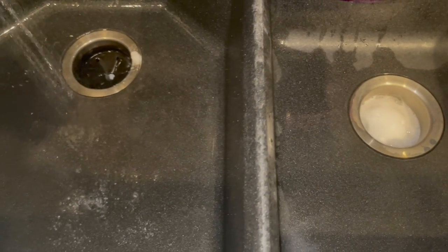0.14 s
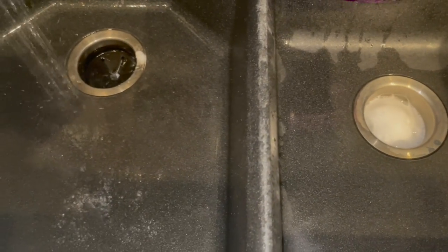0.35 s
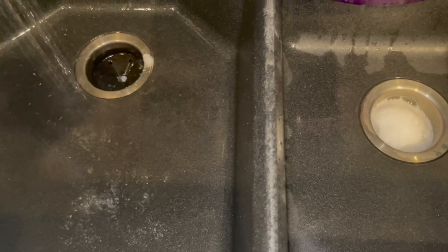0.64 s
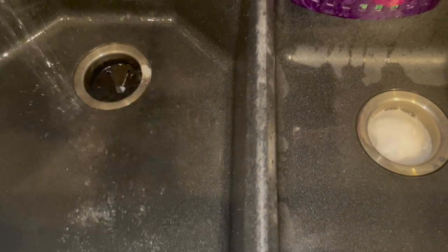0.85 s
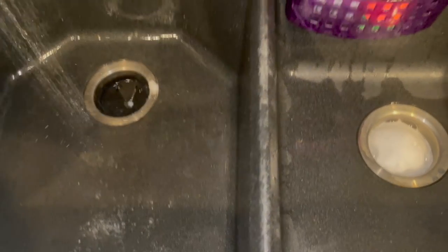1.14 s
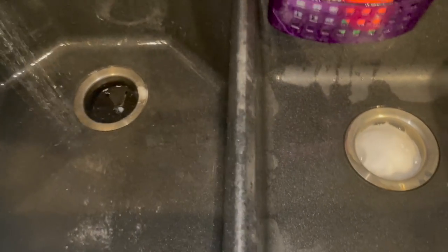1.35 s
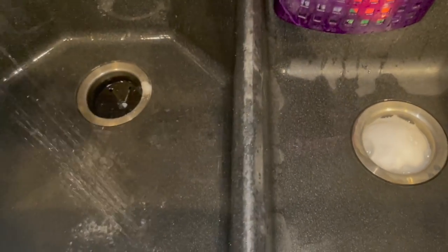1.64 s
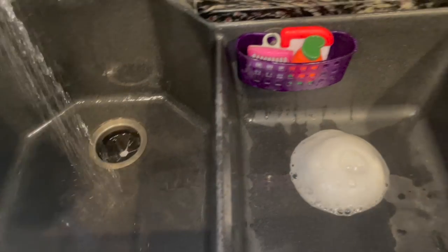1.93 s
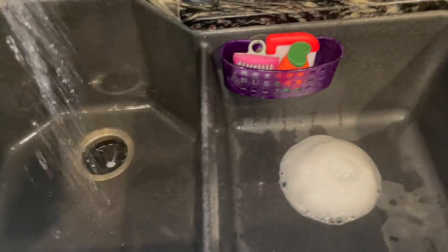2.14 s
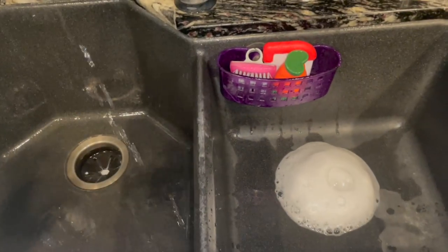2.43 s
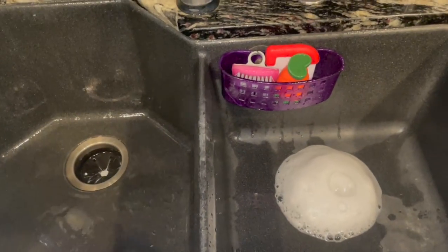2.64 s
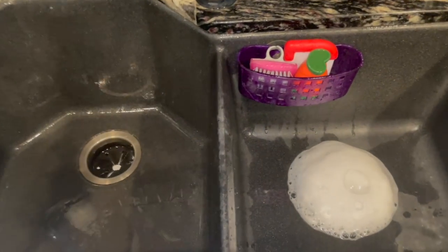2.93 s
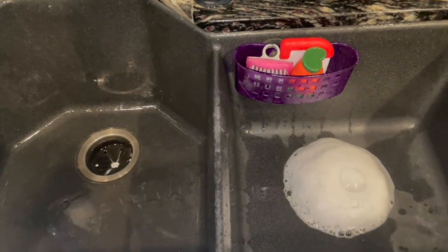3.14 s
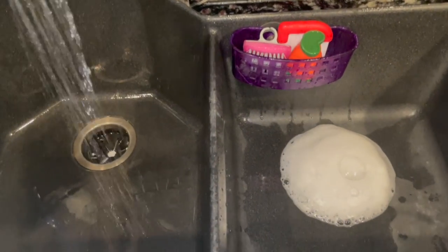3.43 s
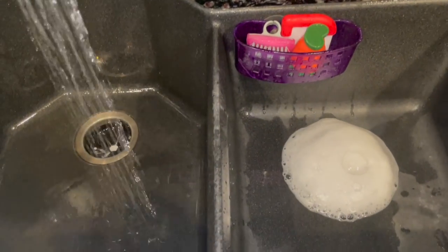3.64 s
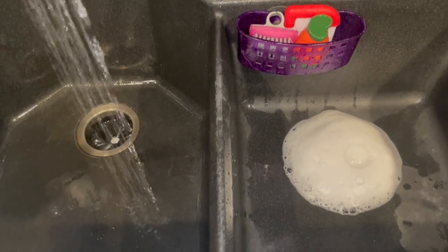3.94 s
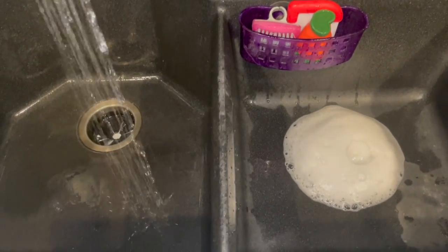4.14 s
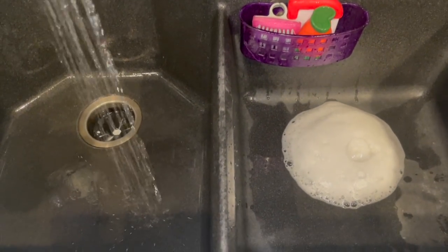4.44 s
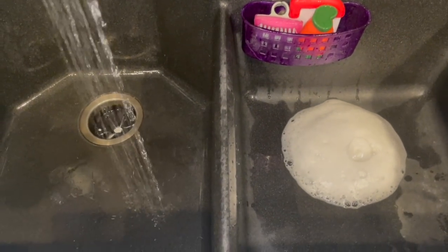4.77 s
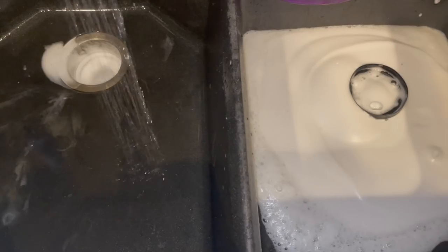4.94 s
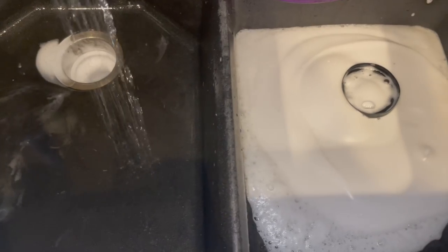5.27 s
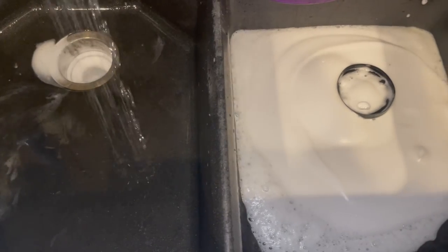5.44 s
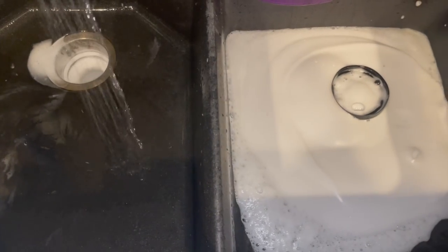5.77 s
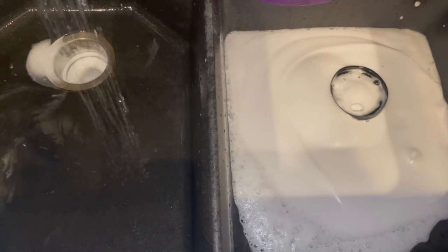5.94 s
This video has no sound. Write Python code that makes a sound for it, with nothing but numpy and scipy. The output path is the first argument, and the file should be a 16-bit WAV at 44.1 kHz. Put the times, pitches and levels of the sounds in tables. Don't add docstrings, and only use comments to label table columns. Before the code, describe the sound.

Close kitchen disposal motor whirring under running spray, abruptly turning to muffled bubbling gulps in a flooded drain, then abruptly to harsh, hissing grinding.

```python
import sys
import numpy as np
from scipy import signal
from scipy.fft import rfft, irfft
from scipy.io import wavfile
from scipy.ndimage import uniform_filter1d

SR = 44100
rng = np.random.default_rng(int(sys.argv[2]) if len(sys.argv) > 2 else 0)


def wrap_up_sound(samples):
    columns = np.atleast_2d(samples).T
    tamed = np.clip(columns, -1, 1)
    steps = np.round(tamed * 32767).astype(np.int16)
    wavfile.write(sys.argv[1], SR, steps)


def how_loud(loudness_db):
    steps = np.asarray(loudness_db, float) / 20
    return 10 ** steps


N = 269010
FLOODED = 1

CUTS = [0, 1.7215, 4.8885, 6.1]
# low edge in Hz, high edge in Hz, flicker in dB,
# flickers per second, once-a-turn beat [0-1], steadiness [0-1].
LAYERS = [(0, 580, 0, 30, 0.17, 0.52), (605, 2380, 1.5, 28, 0.01, 0.86), (2820, 4020, 1.5, 270, 0, 0.2),
          (4620, 7500, 0.8, 230, 0, 1), (7200, 13600, 0.5, 300, 0, 1)]


def evened(x):
    return x / np.sqrt(np.mean(x ** 2) + 1e-20)


def slow(count, per_s):
    size = max(int(SR / per_s / 2), 1)
    smooth = uniform_filter1d(rng.standard_normal(count), size)
    return evened(uniform_filter1d(smooth, size))


def shaped(x, gain):
    return irfft(rfft(x) * gain, x.shape[-1])


def motor(t, stretch):
    shaft_hz = [64.12, 63.93, 63.53]
    slosh_db = [-1.36, 3.5, 1.7]
    # multiple of the shaft, then dB at the start of each stretch.
    low_orders = [(1, -28.5, -29.5, -35), (2, -27, -23.5, -26), (3, -17.5, -32, -33), (4, -24.5, -41, -45)]
    # dB per second in each stretch, share of the slosh felt [0-1].
    order_drift = [(-0.2, 0.06, -0.5, 0.38), (-4.5, -3, -0.9, 0.23), (-1.5, -3.5, -0.5, 1),
                   (1.4, 3.95, 11, 1)]
    # multiple of the shaft, then dB in each stretch.
    high_orders = [(5, -46, -50, -39.5), (6, -32.5, -42.5, -37), (8, -38, -46, -39), (10, -43, -50.5, -42),
                   (18, -37.5, -54, -39.5), (36, -46, -96, -46)]

    count = len(t)
    turns = np.cumsum(shaft_hz[stretch] + 0.094 * slow(count, 2.75)) / SR
    load = slow(count, 4.1)
    gulp_db, push, hum = 0, 0, 0
    if stretch == FLOODED:
        gulp_db = 0.18 * uniform_filter1d(opening(t), size=2000)
        push, hum = glugs(t)
    for (k, *start_db), (*drift_db, slosh) in zip(low_orders, order_drift):
        order_db = start_db[stretch] + drift_db[stretch] * (t - t[0])
        order_db = order_db + slosh * slosh_db[stretch] * load + gulp_db * (k > 1)
        strength = how_loud(order_db) + push * (k == 2)
        hum = hum + strength * np.cos(2 * np.pi * (k * turns + rng.random()))
    for k, *order_db in high_orders:
        strength = how_loud(order_db[stretch] + 3.06 * slow(count, 6.5))
        hum = hum + strength * np.cos(2 * np.pi * (k * (turns + 0.0041 * load) + rng.random()))
    return np.sqrt(2) * hum, turns


def housing():
    # frequency in Hz, dB per Hz.
    whirr_spectrum = [(500, 13), (620, 8), (1000, -0.5), (1900, -31), (2100, -30), (2600, -23), (6000, -44),
                      (11000, -29), (15000, -41), (16000, -72)]
    hz = np.fft.rfftfreq(N, 1 / SR)
    f, whirr_db = np.transpose(whirr_spectrum)
    gain = how_loud(np.interp(np.log(hz + 1), np.log(f), whirr_db, -99, -99))
    whirr = shaped(rng.standard_normal((2, N)), gain)
    return how_loud(-37 - 1.5) * evened(whirr)


def colour(hz, stretch):
    # frequency in Hz, then dB per Hz in each stretch.
    rumble = [(40, -74, -76, -97), (80, -69, -53, -74), (100, -60.5, -48, -55.5), (153, -49, -44.5, -45.5),
              (174.4, -41.5, -48.5, -42.5), (211.5, -40, -48, -34), (238.2, -41, -51, -38),
              (288, -58.5, -65, -53), (328, -52.5, -60.5, -46.5), (464, -57.5, -55.5, -45),
              (494, -55.5, -54, -39.5), (546, -61.5, -72.5, -54), (783, -62.5, -72, -57)]
    # frequency in Hz, then dB per Hz in each stretch.
    grind = [(987, -50, -62.5, -53), (1010, -61, -70, -55.5), (1440, -60.5, -71, -63.5),
             (1630, -68, -76.5, -65), (1832, -59.5, -76, -56.5), (2280, -65, -81, -70),
             (2530, -73.5, -86, -63.5), (3180, -62, -94.5, -69), (4080, -72, -92, -67.5),
             (3970, -75, -96, -71)]
    # frequency in Hz, then dB per Hz in each stretch.
    hiss = [(5020, -75, -87.5, -70), (5700, -70, -88, -76.5), (6180, -80.5, -94, -77),
            (7000, -71.5, -95.5, -74.5), (7400, -84.5, -94.5, -80.5), (9900, -67.5, -97, -66),
            (11000, -77, -99.5, -76.5), (13000, -74.5, -98, -80), (14600, -75, -101, -73.5),
            (15650, -88.5, -103, -89), (15900, -120, -120, -120)]
    # centre in Hz, width in Hz, boost in dB in each stretch.
    basin = [(244.5, 31.4, 4.6, 8.1, 8.2), (396, 3.3, 1.3, 1.1, 1.9), (461, 48, 11, 5.75, 3.4),
             (660, 26, 2.5, 11, 4.3), (759, 51, 3.4, 0.67, 5.8), (1189.6, 38, 14.6, 10.7, 16),
             (1329, 36, 5.6, 8.5, 2.9), (1675, 77, 12.8, 7.6, 15.6), (1773, 36, 12.1, 17, 18.3),
             (2207, 85, 3, 7, 15.4), (3250, 254, 3.1, 8.1, 6), (3530, 400, 1.1, 1.7, 7.3),
             (6064, 340, 6.9, 7.1, 9.8)]
    rows = np.array(rumble + grind + hiss)
    body_db = np.interp(np.log(hz + 1), np.log(rows[:, 0]), rows[:, 1 + stretch])
    for centre_hz, width_hz, *boost_db in basin:
        body_db += boost_db[stretch] / (1 + (2 * (hz - centre_hz) / width_hz) ** 2)
    return how_loud(body_db) * np.sqrt(SR / 2)


def surges(t, stretch):
    # time in seconds, level in dB.
    effort = [
        [(0, -0.5), (.3, 0.8), (1.2, 0.56), (1.72, -1.2)],
        [(1.72, 0.75), (4.89, -0.97)],
        [(4.89, -3), (5.1, 0.9), (5.5, 0.2), (6.1, -0.2)],
    ]
    swell_db = [0.94, 1.24, 1.65]
    # share of the opening, share of the tap,
    # offset in dB, drift in dB per second.
    follows = [(0.35, 0.017, -0.5, 0.95), (0.78, 0.022, -1.46, -0.1), (0.67, 0.12, 0, -2),
               (0.58, 1, -2, 4.5), (0.71, 0.54, -2.5, 1.5)]
    # time in seconds, level in dB.
    tap = [
        (1.72, 5.5),
        (2.5, 6.5),
        (3.35, 5),
        (3.5, 2),
        (4.22, -5),
        (4.3, -14),
        (4.89, -13),
    ]
    load_db = np.interp(t, *np.transpose(effort[stretch]))
    surge_db = np.array([load_db + swell_db[stretch] * slow(len(t), 8.8) for _ in LAYERS])
    if stretch == FLOODED:
        gulp_share, tap_share, offset_db, drift_db = (c[:, None] for c in np.transpose(follows))
        surge_db += gulp_share * opening(t)
        surge_db += tap_share * np.interp(t, *np.transpose(tap))
        surge_db += offset_db + drift_db * (t - t.mean())
    return surge_db


def spatter(count, stretch):
    # droplets per second, size spread in dB, share in dB.
    spatters = [(400, 46, -15), (226, -0.5, -1), (426, -13, -9.5)]
    per_s, spread_db, share_db = spatters[stretch]
    sizes = how_loud(spread_db * np.minimum(rng.exponential(1, count), 3.5))
    hits = (rng.random(count) < per_s / SR) * sizes
    return evened(signal.lfilter([1], [1, -np.exp(-1 / (0.0031 * SR))], hits)), share_db


def steadied(x, share):
    power = uniform_filter1d(x[0] ** 2, size=1800)
    return x * (np.mean(power) / (abs(power) + 1e-20)) ** (np.clip(share, 0, 1) / 2)


def water(t, turns, stretch):
    hz = np.fft.rfftfreq(len(t), 1 / SR)
    body, out = colour(hz, stretch), np.zeros((2, len(t)))
    gust = slow(len(t), 46.0)
    droplets, share_db = spatter(len(t), stretch)
    for (lo_hz, hi_hz, flicker_db, rate, beat, steady), level_db in zip(LAYERS, surges(t, stretch)):
        surge_db = uniform_filter1d(level_db, size=1500 if lo_hz < 100 else 300)
        flicker = how_loud(flicker_db * slow(len(t), rate) + 0.18 * gust)
        drive = evened(flicker * (1 + beat * np.cos(2 * np.pi * turns)))
        drive = evened(drive + how_loud(share_db) * droplets * (lo_hz > 2000))
        band = 1 / np.sqrt((1 + (lo_hz / (hz + 1)) ** 12) * (1 + (hz / hi_hz) ** 12))
        layer = shaped(drive * rng.standard_normal(out.shape), body * band)
        layer = steadied(layer, steady)
        out += shaped(layer * how_loud(surge_db), np.minimum(4 * band, 1))
    return out


def patchy(x, stretch):
    depth_db = [1, 2.0, 1]
    hz, _, z = signal.stft(x, SR, nperseg=512, noverlap=384)
    field = rng.standard_normal(z.shape[1:])
    for _ in range(2):
        field = uniform_filter1d(field, size=5, axis=0)
        field = uniform_filter1d(field, size=12, axis=1)
    above_rumble = np.clip(hz / 2500, 0, 1)[:, None]
    z = z * how_loud(depth_db[stretch] * evened(field) * above_rumble)
    return signal.istft(z, SR, nperseg=512, noverlap=384)[1][:, :x.shape[1]]


def echoed(x):
    # delay in ms, gain.
    walls = [(2.3, -.18), (3.7, .18), (5.9, -.16), (8.3, -.16), (12.1, .15), (17.3, .13)]
    hz = np.fft.rfftfreq(x.shape[1], 1 / SR)
    echoes = sum(gain * np.exp(-2j * np.pi * hz * delay_ms / 1000) for delay_ms, gain in walls)
    return shaped(x, 1 + echoes * np.clip(hz / 600 - .5, 0, 1))


def opening(t):
    # start in seconds, length in seconds, opening in dB.
    gulps = [(1.702, 0.21, 15), (1.992, 0.12, 14.5), (2.162, 0.13, 14), (2.396, 0.067, 17),
             (2.49, 0.089, 6.5), (2.62, 0.15, 8), (2.816, 0.23, 8.5), (3.093, 0.086, 11),
             (3.278, 0.11, 10.5), (3.498, 0.082, 4.5), (3.634, 0.15, 0), (3.839, 0.075, 9.5),
             (4.032, 0.048, 8), (4.187, 0.085, -4), (4.328, 0.088, -8), (4.444, 0.14, -8),
             (4.618, 0.036, 1.5), (4.756, 0.13, -10)]
    rise_s, close_db_per_s, shut_db, shut_sink_db_per_s = 0.07, 236, -5, 3
    start, length, top_db = (c[:, None] for c in np.transpose(gulps))
    rise = np.sin(np.pi / 2 * np.clip((t - start) / rise_s + 0.51, 0, 1)) ** 2
    gulp = rise * how_loud(top_db - close_db_per_s * np.maximum(t - start - length, 0))
    leak = how_loud(shut_db - shut_sink_db_per_s * (t - CUTS[1]))
    return 10 * np.log10((gulp ** 2).sum(0) + leak ** 2)


def choked():
    # centre in Hz, width in Hz, level in dB.
    fuzzy_tones = [(237, 17, -30), (352, 113, -35), (458, 35, -36), (2046, 10, -62.5)]
    hz, t = np.fft.rfftfreq(N, 1 / SR), np.arange(N) / SR
    tones = np.zeros(N)
    for centre_hz, width_hz, tone_db in fuzzy_tones:
        resonance = 1 / (1 + (2 * (hz - centre_hz) / width_hz) ** 2)
        tones += how_loud(tone_db) * evened(shaped(rng.standard_normal(N), resonance))
    growth = how_loud(2 * (t - CUTS[2]))
    return tones * growth * (t > CUTS[1]) * (t < CUTS[2])


def glugs(t):
    # peak in seconds, push in dB, own pitch in Hz, own level in dB.
    pockets = [(1.773, -21, 110, 0), (2.068, -10.5, 108, -12), (2.184, -10.5, 113, -11),
               (2.426, -5, 110, -11), (2.605, -14, 83.4, -16), (2.936, -10, 112, -5),
               (3.134, -12, 111, -15), (3.365, -16, 111, -11), (3.522, -12, 110.5, -9),
               (3.871, -14.5, 110, -12), (4.057, -15, 112, -15), (4.229, -26, 111, -17),
               (4.406, -24, 110, -18), (4.578, -18, 108, -20), (4.761, -21, 109, -16)]
    rise_s, fade_s, hum_db, note_db = 0.018, 0.033, -7.5, 3.5
    peak, push_db, hz, own_db = (c[:, None] for c in np.transpose(pockets))
    start = peak - rise_s
    rise = np.sin(np.pi / 2 * np.clip((t - start) / rise_s, 0, 1)) ** 2
    fade = np.exp(-np.maximum(t - start - rise_s, 0) / fade_s)
    shape = how_loud(push_db) * rise * fade
    note = how_loud(own_db + note_db) * shape * np.sin(2 * np.pi * hz * (t - start))
    return how_loud(hum_db) * shape.sum(0), note.sum(0)


def drops():
    # start in seconds, peak in dB, centre in Hz.
    ticks = [(1.8158, -37, 13100), (2.0931, -44, 11700), (2.164, -32, 13500), (2.3057, -34, 12400),
             (2.4438, -43, 13600), (2.9018, -35, 7300), (3.2904, -37, 7400), (3.3533, -37, 10900),
             (3.61, -26, 7800), (3.6681, -45, 13300), (3.6875, -42, 13100), (3.7174, -47, 13600),
             (3.75, -51, 13000), (3.7569, -44, 13400), (3.769, -47.5, 13000), (4.0103, -43, 12900),
             (4.1061, -50, 7300), (4.119, -36, 11800), (4.148, -39, 9630), (4.1739, -51, 13400),
             (4.2058, -44, 12100), (4.2587, -39, 9800), (4.3555, -57, 11700), (4.4782, -50, 13800),
             (4.5276, -53, 11100), (4.589, -53, 13100), (4.7376, -46, 13100), (4.7721, -31.5, 13700),
             (4.7874, -42.5, 10200), (4.9382, -37, 13400)]
    size = 2048
    out, t = np.zeros((2, N + size)), np.arange(size) / SR
    hz = np.fft.rfftfreq(size, 1 / SR)
    shape = np.minimum(t / 0.00083, 1) * ((t < .003) + np.exp(-t / 0.0054))
    for start, peak_db, centre_hz in ticks:
        tone = np.exp(-(np.log((hz + 1) / centre_hz) / 0.42) ** 2)
        burst = evened(shaped(rng.standard_normal((2, size)), tone))
        first = round(start * SR)
        out[:, first:first + size] += how_loud(peak_db - 4.5) * burst * shape
    return out[:, :N]


def scene():
    out = drops() + housing()
    for stretch in range(3):
        a, b = round(CUTS[stretch] * SR), round(CUTS[stretch + 1] * SR)
        t = np.arange(a, b) / SR
        hum, turns = motor(t, stretch)
        splashing = patchy(water(t, turns, stretch), stretch)
        out[:, a:b] += echoed(splashing)
        out[0, a:b] += hum
    out[0] += choked()
    return out


def roll_off(x):
    return signal.sosfilt(signal.butter(12, 15810, fs=SR, output="sos"), x)


def record(dry):
    # frequency in Hz, radians by which the left leads.
    port_lead = [(0, 0), (150, .3), (330, .85), (560, .8), (780, 1.3), (1120, 5.7), (1810, 9.4),
                 (2150, 12.3), (3270, 15.2), (3880, 19.3), (5170, 20.4), (6700, 18.85), (7800, 16.05),
                 (10200, 15.2), (13200, 12.57)]
    # frequency in Hz, left minus right in dB.
    port_balance = [(60, 1.5), (140, 2), (210, .5), (330, 3.5), (700, 7.5), (1290, 4.5), (2700, 3.5),
                    (4200, 5), (6400, 1.5), (7600, 0)]
    # frequency in Hz, likeness [0-1].
    port_same = [(60, .99), (200, .98), (300, .9), (450, .96), (800, .85), (1500, .82), (3000, .86),
                 (5300, .65), (6600, .68), (7900, .88), (9000, .96), (10200, .92), (11300, .75),
                 (13000, .95)]
    hz = np.fft.rfftfreq(N, 1 / SR)
    lead = np.interp(hz, *np.transpose(port_lead))
    tilt = how_loud(np.interp(hz, *np.transpose(port_balance)) / 2)
    same = np.clip(np.interp(hz, *np.transpose(port_same)), 0, 1)
    left = shaped(dry[0], tilt)
    right = shaped(dry[0], same * np.exp(-1j * lead) / tilt)
    right += shaped(dry[1], np.sqrt(1 - same ** 2) / tilt)
    limited = 0.94 * np.tanh(np.array([left, right]) / 1.348) * 1.269
    mix = shaped(limited, hz < 15850)
    return roll_off(mix)


dry = scene()
out = record(dry)
wrap_up_sound(out)
```